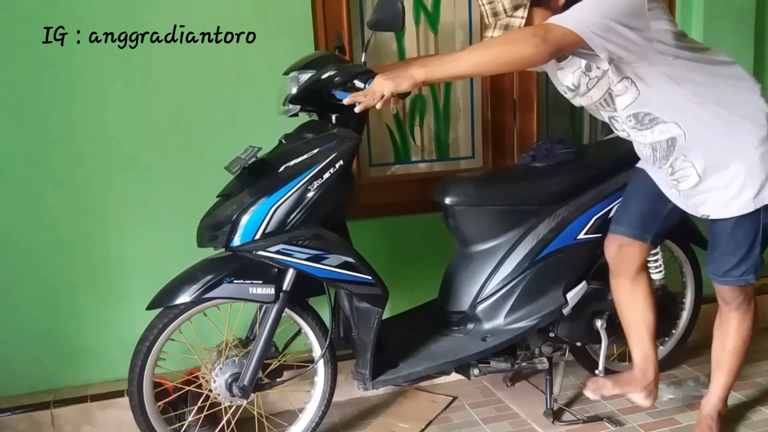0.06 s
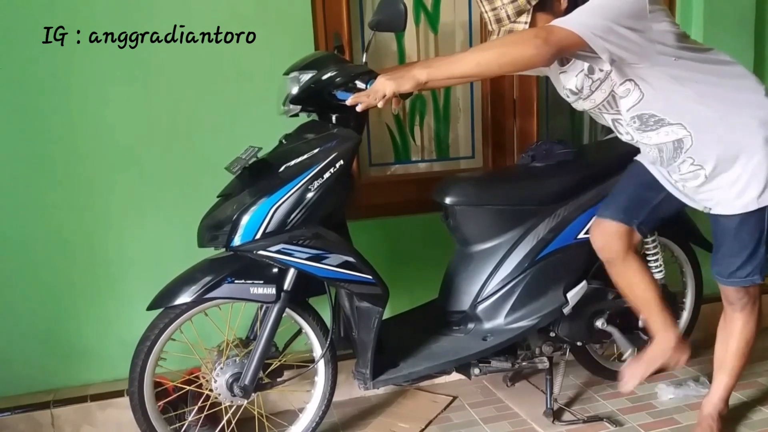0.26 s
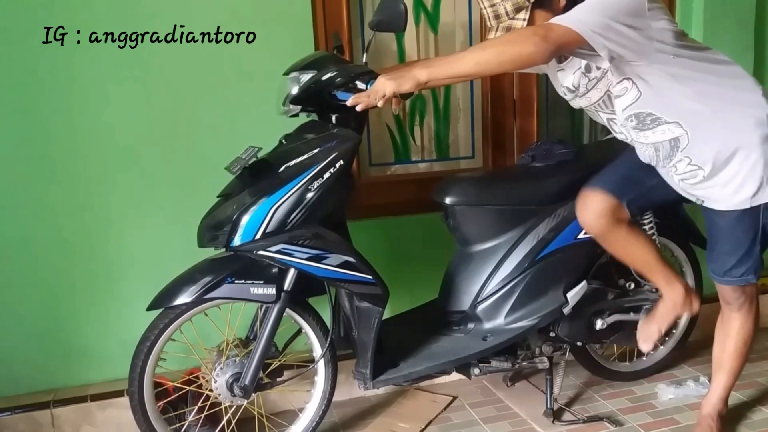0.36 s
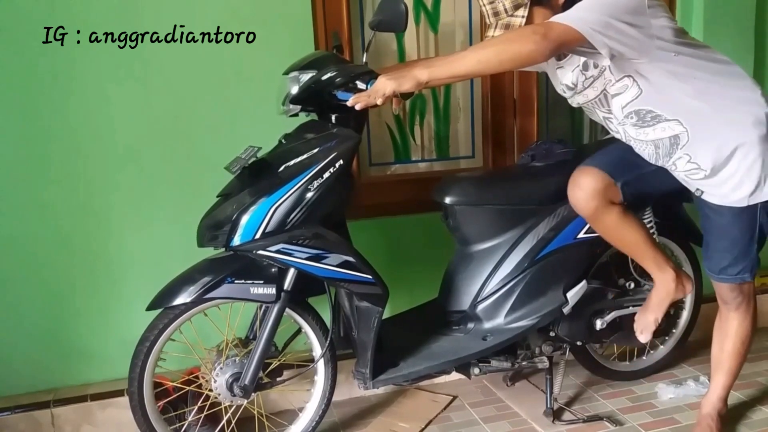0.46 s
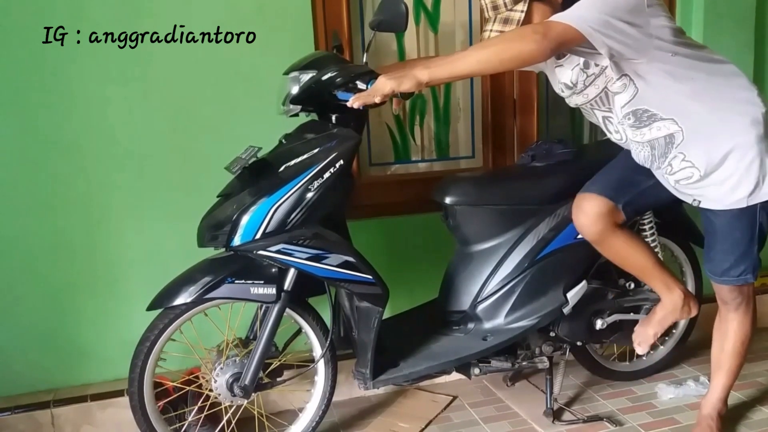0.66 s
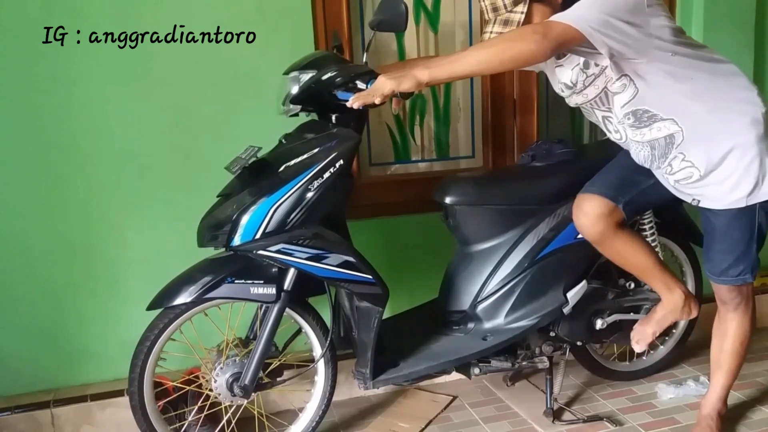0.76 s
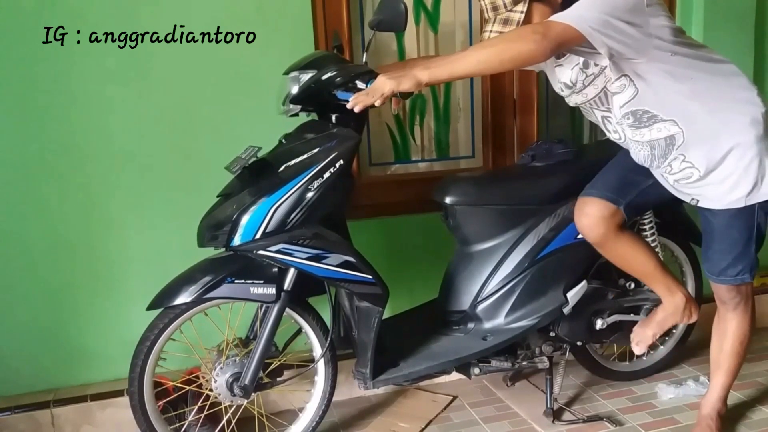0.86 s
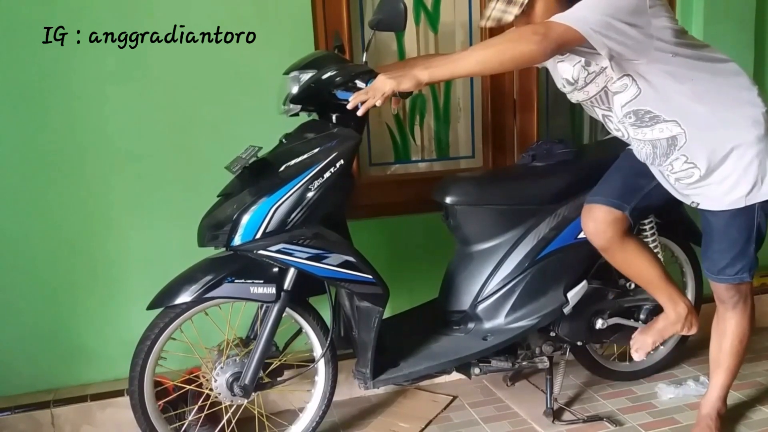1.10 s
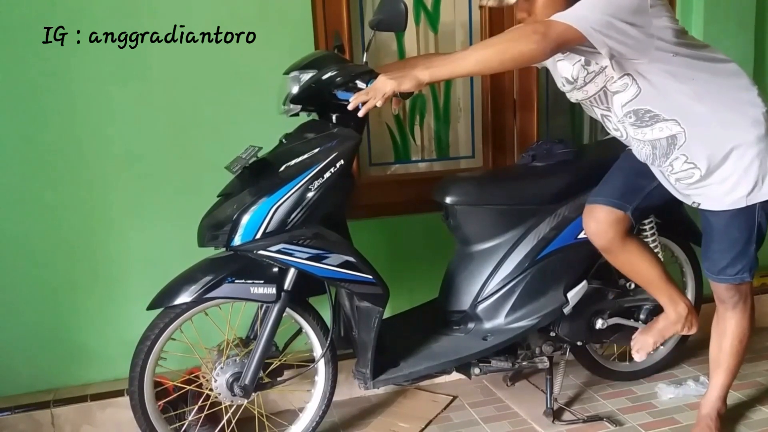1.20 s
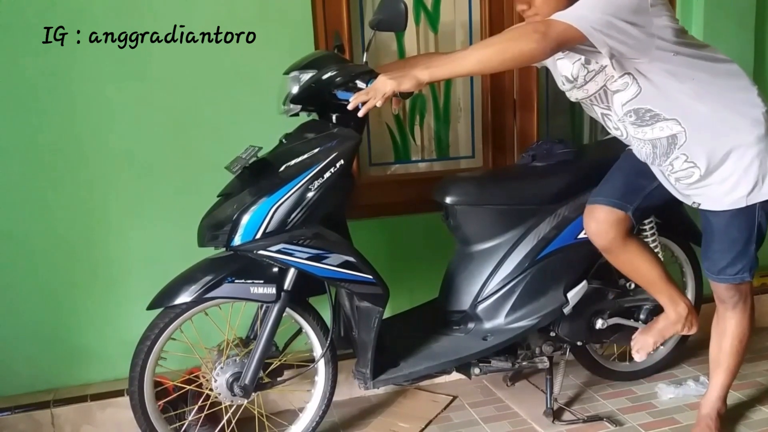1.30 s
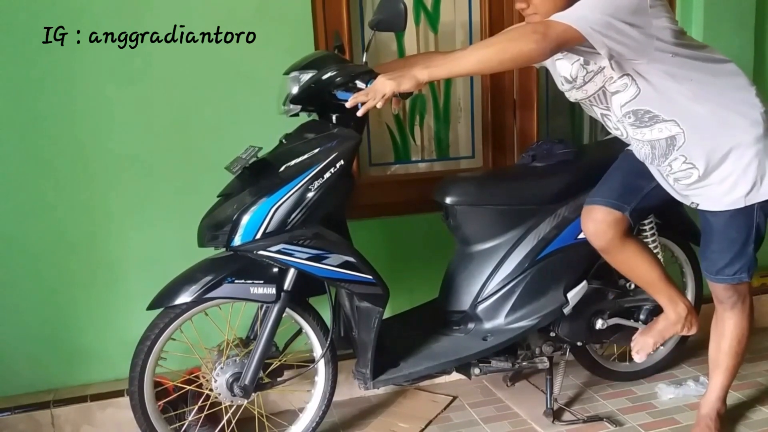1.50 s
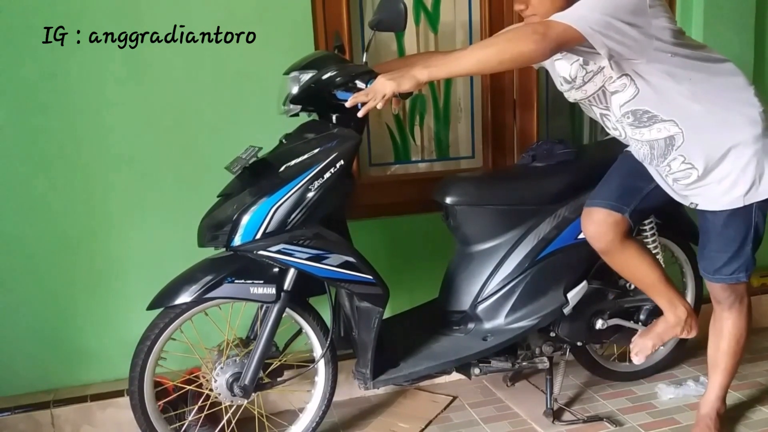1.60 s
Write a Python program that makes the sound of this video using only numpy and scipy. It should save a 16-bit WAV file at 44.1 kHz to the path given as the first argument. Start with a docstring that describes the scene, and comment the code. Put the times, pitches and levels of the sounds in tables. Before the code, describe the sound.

In an echoing room, a scooter kick-start lever clatters against its stop amid a footfall and low rocking thuds. Pushed down again, it clanks and turns the engine with soft puffs, then squeaks faintly and bottoms out. The engine never fires.

```python
"""A faint squeak and a whirr of gear teeth: a scooter's kick-starter springs back in a hard, echoing room.
A foot thumps on the floor, then the scooter rocks on its stand in low thuds.
The lever clatters against its stop, ringing the casing.
The next slow push catches the gear and turns the engine over in soft piston chuffs; it does not fire.
The dry pivot squeaks and the lever bottoms out."""
import sys
import numpy as np
from scipy import signal
from scipy.fft import rfft, irfft
from scipy.io import wavfile
from scipy.ndimage import uniform_filter1d

SR = 44100
rng = np.random.default_rng(int(sys.argv[2]) if len(sys.argv) > 2 else 0)


def dump_mix(stems):
    """Bounce the given channels to the path in sys.argv[1] as a 16-bit WAV at rate SR."""
    frames = np.atleast_2d(stems).T  # one column per channel
    limited = np.clip(frames, -1, 1)  # hard clip at full scale
    pcm = np.round(limited * 32767).astype(np.int16)
    wavfile.write(sys.argv[1], SR, pcm)


N = 72765


def amp(db):
    """Decibels to gain."""
    return 10 ** (np.asarray(db) / 20)


def unit_rms(x):
    """Scale to rms 1."""
    return x / np.sqrt(np.mean(x ** 2) + 1e-20)


def curve_at(points, hz):
    """Interpolate (frequency [Hz], value) points on a log-frequency axis."""
    point_hz, value = np.transpose(points)
    return np.interp(np.log(hz + 1), np.log(point_hz + 1), value)


def add(mix, start_s, sound):
    """Add a sound to the mix in place."""
    part = mix[round(start_s * SR):][:len(sound)]
    part += sound[:len(part)]


def coloured(x, colour):
    """Filter by (frequency [Hz], gain [dB]) points; output rms 1."""
    gain = amp(curve_at(colour, np.fft.rfftfreq(len(x), 1 / SR)))
    return unit_rms(irfft(rfft(x) * gain, len(x)))


def swell(t, rise_s):
    """Envelope: peaks at 1 after rise_s, then decays."""
    return t / rise_s * np.exp(1 - t / rise_s)


def echoes(fill_s):
    """Dense unit-energy tail off plaster and tiles: fills while the source sounds, treble dies first."""
    # room decay: (frequency [Hz], T60 [s])
    room_t60 = [(80, 1.66), (300, 0.98), (800, 0.84), (1600, 0.83), (3200, 0.93), (5000, 0.76),
                (7500, 0.67), (11000, 0.62), (13000, 0.49), (15500, 0.64)]
    gap_s, build_s = 0.0013, 0.012
    t = np.arange(N) / SR
    hz, frame_s, spectra = signal.stft(rng.standard_normal(N), SR, nperseg=256)
    decay = amp(-60 * frame_s / curve_at(room_t60, hz)[:, None])
    tail = signal.istft(spectra * decay, SR, nperseg=256)[1][:N]
    tail *= np.clip((t - gap_s) / build_s, 0, 1)
    tail *= np.sqrt(1 - np.exp(-2 * t / fill_s))
    return tail / np.linalg.norm(tail)


def room(x, wet_db):
    """Direct sound plus echoes."""
    return x + amp(wet_db) * signal.fftconvolve(x, echoes(fill_s=0.012))[:N]


def air():
    """Quiet, steady low noise of the room's air."""
    # air spectrum: (frequency [Hz], gain [dB])
    colour = [(20, -34), (40, -20.5), (60, -1.5), (95, 4), (190, -2), (320, -6), (700, -13), (1500, -17.5),
              (3000, -29), (5000, -36), (8000, -41.5), (15500, -40.5)]
    return amp(-61.5) * coloured(rng.standard_normal(N), colour)


def squeaks():
    """The dry pivot sings thin, unsteady notes."""
    # pivot squeaks: (start [s], length [s], pitch [Hz], level [dB])
    notes = [(0.101, 0.24, 3570, -83), (1.144, 0.07, 5010, -60), (1.241, 0.114, 4930, -76)]
    waver_depth, fade_s = 0.008, 0.012
    out = np.zeros(N)
    for start_s, length_s, hz, level_db in notes:
        t = np.arange(0, length_s, 1 / SR)
        waver = unit_rms(uniform_filter1d(rng.standard_normal(N), size=200))[:len(t)]
        phase = 2 * np.pi * np.cumsum(hz * (1 + waver_depth * waver)) / SR
        envelope = np.clip(np.minimum(t, length_s - t) / fade_s, 0, 1)
        add(out, start_s, amp(level_db) * envelope * np.sin(phase))
    return out


def whirr():
    """Gear teeth scrape past each other as the spring pulls the lever back to its stop."""
    # scrape spectrum: (frequency [Hz], gain [dB])
    colour = [(40, -3), (150, 7), (350, 3), (700, 7), (1500, 2.5), (2700, 0), (3700, -3), (5000, -13),
              (7000, -20), (10000, -33), (15500, -44.5)]
    start_s, rise_s, fall_s, end_s = 0.1457, 0.0312, 0.01, 0.33
    level_db, teeth_per_s = -47, 580
    t = np.arange(N) / SR
    speed = np.clip((t - start_s) / rise_s, 0, 1) * np.clip((end_s - t) / fall_s, 0, 1)
    tooth_ripple = 1 + 0.2 * np.cos(2 * np.pi * np.cumsum(teeth_per_s * speed) / SR)
    return amp(level_db) * speed ** 2 * coloured(rng.standard_normal(N) * tooth_ripple, colour)


def thuds():
    """A foot thumps on the floor, then the scooter rocks on its stand: brief, low, gritty tones."""
    # footfall, then rocking: (start [s], pitch [Hz], level [dB], rise [s])
    bumps = [(0.2044, 101, -20, 0.0094), (0.2358, 121.3, -27, 0.023), (0.265, 179.8, -35, 0.019),
             (0.2937, 117.5, -25.5, 0.018), (.392, 106, -31.5, 0.0052), (0.457, 100.4, -33.5, 0.0078),
             (0.489, 101.7, -35, 0.0043)]
    # (frequency [Hz], gain [dB])
    grit_colour = [(30, -16.5), (65, -19), (180, -7), (400, -20.5), (4000, -67)]
    out, t = np.zeros(N), np.arange(SR // 2) / SR
    for start_s, hz, level_db, rise_s in bumps:
        grit = 0.13 * coloured(rng.standard_normal(len(t)), grit_colour)
        tone = np.sin(2 * np.pi * hz * t)
        add(out, start_s, amp(level_db) * swell(t, rise_s) * (grit - tone))
    return out


def casing_ring(low_db, high_db, top_db, size):
    """Unit-energy impulse response of the casing: broad colour, tilted per blow, plus ringing modes."""
    # casing spectrum: (frequency [Hz], gain [dB])
    colour = [(40, -36), (250, -11), (500, -7), (750, -2.5), (1050, 1.5), (1350, 1.5), (1600, -0.5),
              (2100, 0.5), (2900, 1), (4700, -3.5), (5800, -8), (6900, -9.5), (7900, -19.5), (10500, -27.5),
              (15500, -38.5)]
    # casing modes: (frequency [Hz], width [Hz], gain relative to the colour [dB])
    modes = [(191.3, 18, 10.5), (319, 15, 7.5), (1278, 13, -6.5), (1472, 52, 0.5), (1515, 75, -1),
             (1656, 95, -1.5), (2752, 62, -2.5), (3435, 320, -7), (3856, 60, -0.5), (4480, 540, -5),
             (5000, 210, -1.5), (6710, 160, -6)]
    hz = np.fft.rfftfreq(size, 1 / SR)
    tilt = [(934, low_db), (1340, 0), (4000, high_db), (10000, top_db)]
    gain_db = curve_at(colour, hz) + curve_at(tilt, hz)
    log_gain = np.log(amp(np.r_[gain_db, gain_db[-2:0:-1]]))
    minimum_phase = np.exp(np.conj(signal.hilbert(log_gain)))[:len(hz)]
    resonances = sum(amp(db) / (1 + 2j * (hz - mode_hz) / width_hz) for mode_hz, width_hz, db in modes)
    ring = irfft(minimum_phase * (1 + resonances))
    return ring / np.linalg.norm(ring)


def clanks():
    """Lever and gear strike the casing: each blow is a rattle of contacts that rings it and the room."""
    # blows: (start [s], level [dB], rattle decay [s], low [dB], high [dB], top [dB], echoes [dB])
    blows = [(0.24, -46, 0.0072, 24, 6, 12, 4), (.266, -20.5, 0.0037, -8.5, -3, -3, 4.5),
             (0.31, -32, 0.0017, 5.5, 1, 8.5, 9.5), (0.346, -25, 0.011, 2, 2, -9, 4.5),
             (.364, -26.5, 0.013, -5, -7.5, -13.5, 2), (.392, -31, 0.0046, 1, -3, -7, 8),
             (0.568, -34.5, 0.049, 3.5, -3, -9.5, -1.5), (0.652, -37.5, 0.013, 4.5, -9.5, -17.5, 5.5),
             (0.78, -60.5, .003, -7, 5, 20, -5), (0.8074, -31, .008, 2, -5.5, -7.5, 3),
             (0.836, -34.5, 0.027, 3.5, -2, -17, -2.5), (0.8489, -32.5, 0.0037, 8.5, 3, 4, 2),
             (0.9, -61, 0.037, 6, -19, -6, 10), (0.974, -49.5, 0.025, 7, -19, -16, 0),
             (1.066, -56.5, .02, -3.5, -6, -23, 4.5), (1.2083, -39.5, 0.034, 5, -3, -24.5, -1.5),
             (1.287, -50.5, 0.0055, 4, -4.5, -22, 0), (1.396, -61, 0.0047, 11.5, -7, -11, -6)]
    contacts_per_s, rise_s, size = 7000, 0.00057, 8192
    out, t = np.zeros(N), np.arange(size) / SR
    for start_s, level_db, rattle_s, low_db, high_db, top_db, wet_db in blows:
        contacts = rng.choice([-1, 1], size) * (rng.random(size) < contacts_per_s / SR)
        rattle = contacts * np.exp(-t / rattle_s) * np.minimum(t / rise_s, 1)
        arrivals = amp(wet_db) * echoes(fill_s=rattle_s)
        add(arrivals, 0, rattle / np.linalg.norm(rattle))
        ring = casing_ring(low_db, high_db, top_db, size)
        gain = amp(level_db) * np.sqrt(SR / 100)  # level: direct energy spread over 10 ms
        add(out, start_s, gain * signal.fftconvolve(arrivals, ring)[:N])
    return out


def chuffs():
    """The piston pushes soft puffs of air through the engine."""
    # piston puffs: (start [s], level [dB], rise [s])
    puffs = [(.848, -43, 0.021), (0.925, -42.5, 0.013), (0.974, -54, 0.011), (1.284, -54, 0.023)]
    # puff spectrum: (frequency [Hz], gain [dB])
    colour = [(40, -17.5), (90, 4), (145, 5.5), (220, -1.5), (315, 9.5), (430, -13.5), (1000, -1),
              (8000, -63.5)]
    out, t = np.zeros(N), np.arange(SR // 4) / SR
    for start_s, level_db, rise_s in puffs:
        envelope = swell(t, rise_s)
        puff = coloured(rng.standard_normal(len(t)) * envelope, colour)
        add(out, start_s, amp(level_db) * puff * np.sqrt(np.mean(envelope ** 2)))
    return out


def scene():
    """Starter, thuds and engine with their echoes over quiet air; mono."""
    mix = air()
    mix += room(thuds(), wet_db=-16.5)
    mix += room(chuffs(), wet_db=-8)
    mix += room(whirr() + squeaks(), wet_db=2.5)
    mix += clanks()
    return mix[None]


def record(dry):
    """Low-pass at 15.7 kHz."""
    lowpass = signal.firwin(511, 15700, window=("kaiser", 9), fs=SR)
    return signal.oaconvolve(dry, lowpass[None], "same")


dry = scene()
out = record(dry)
dump_mix(out)
```